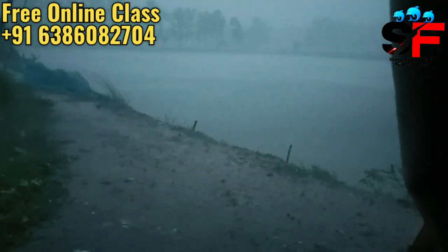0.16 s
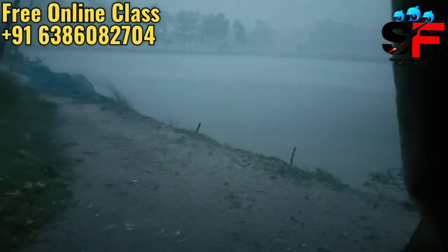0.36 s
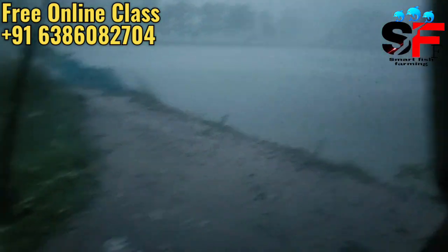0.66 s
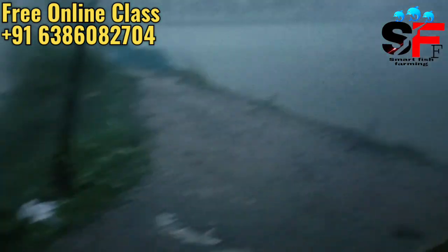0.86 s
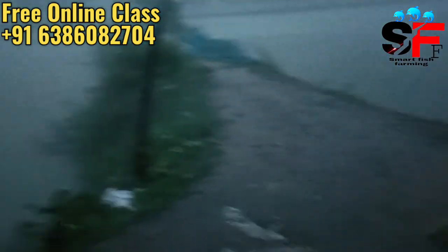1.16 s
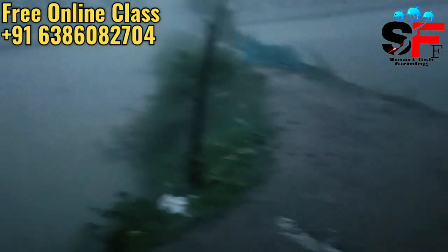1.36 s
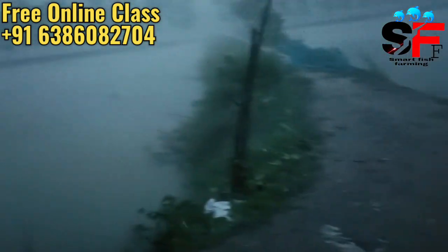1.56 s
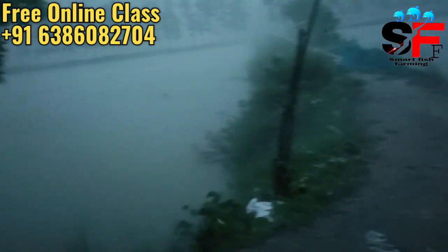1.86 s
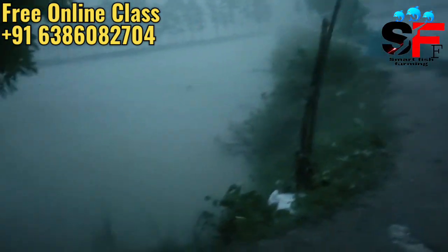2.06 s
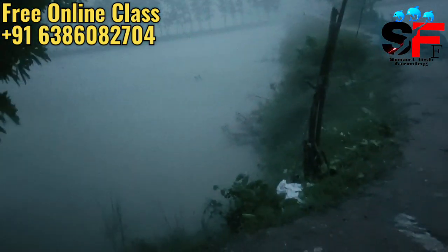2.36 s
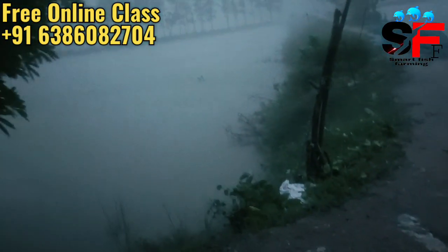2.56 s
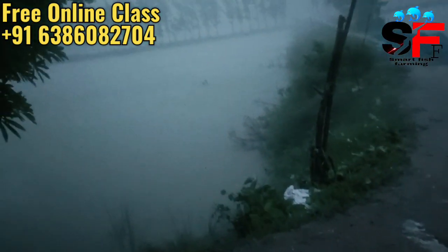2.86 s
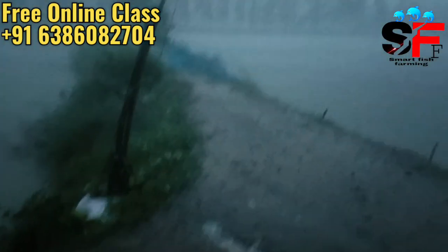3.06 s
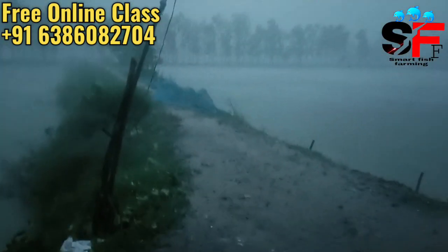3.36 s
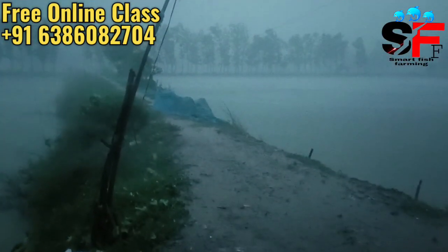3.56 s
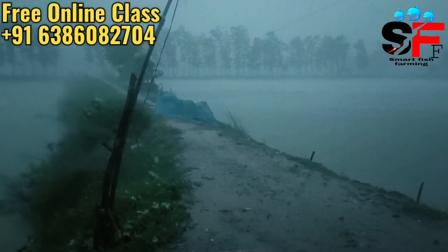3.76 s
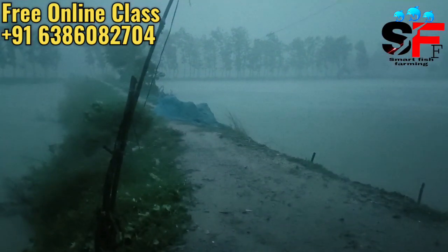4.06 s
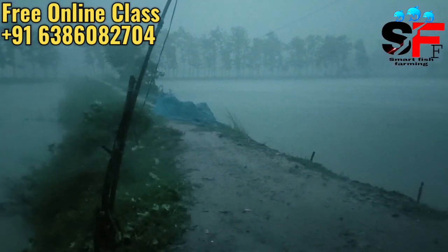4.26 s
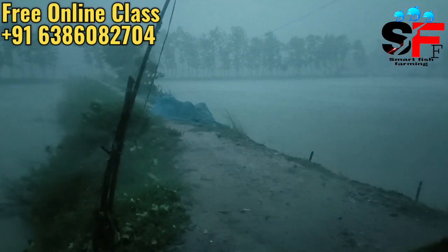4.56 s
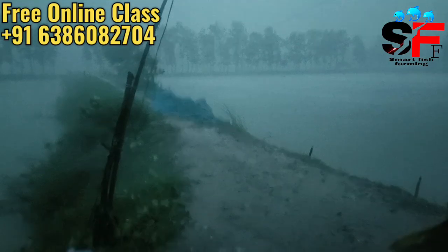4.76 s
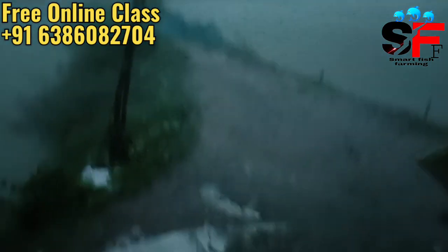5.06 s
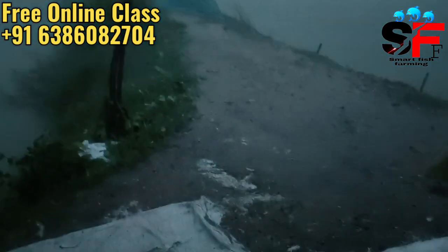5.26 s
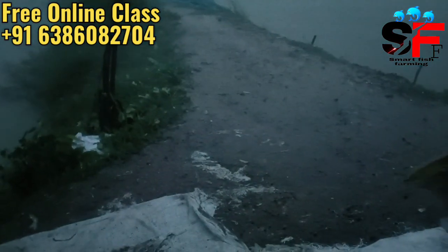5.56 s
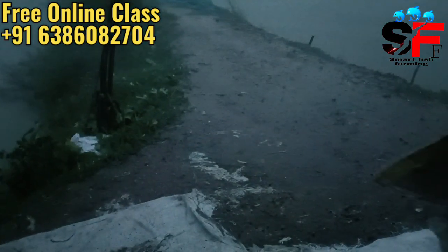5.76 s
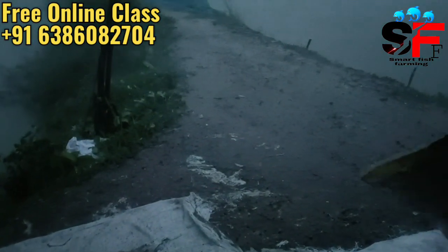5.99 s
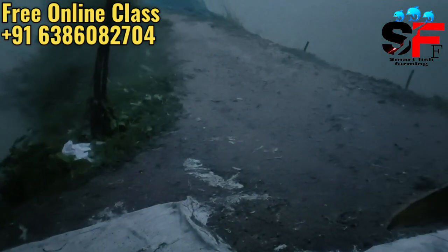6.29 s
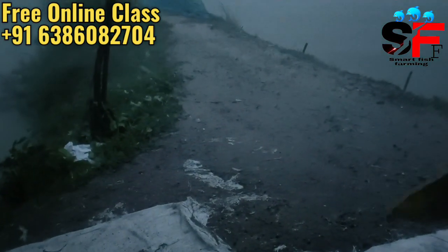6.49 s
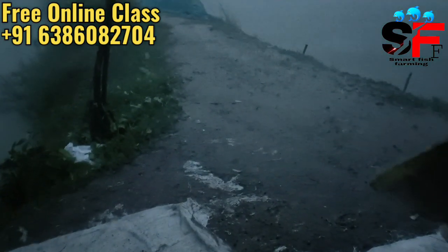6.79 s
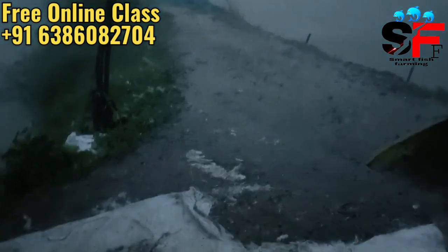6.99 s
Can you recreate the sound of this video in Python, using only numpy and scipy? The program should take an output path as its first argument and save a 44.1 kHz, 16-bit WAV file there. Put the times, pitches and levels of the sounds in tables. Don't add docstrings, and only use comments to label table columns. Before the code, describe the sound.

A torrential downpour is already roaring at full strength, a dense wide wash of countless drops striking a pond and muddy bank, with slight hollow colour from a shelter overhead. The hand-held phone gives it a rough, slightly grainy texture, different on each side. Around 0.15 to 0.25 seconds a few tiny, very high drop ticks touch the phone; at about 0.8 a dull, low bump of the hand. Near 1 second the rain surges and the right side opens brighter; small ticks follow at 1.2 and 1.8. Around 1.9 the tone shifts again as the grip changes. From 2.6 the roar fades rapidly, reaching total silence by 2.7. At about 3.3 it cuts back in abruptly, slightly lower at first, then continues as a steady, even rush with gentle swells until the end at about 7 seconds.

```python
import sys
import numpy as np
from scipy import signal
from scipy.io import wavfile
from scipy.ndimage import uniform_filter1d, minimum_filter1d

SR = 44100
rng = np.random.default_rng(int(sys.argv[2]) if len(sys.argv) > 2 else 0)


def undo_db(level):
    steps = np.asarray(level, float) / 20
    return 10 ** steps


def dump(signal):
    limited = np.clip(np.atleast_2d(signal).T, -1, 1)
    pcm = np.round(limited * 32767).astype(np.int16)
    wavfile.write(sys.argv[1], SR, pcm)


N = 314433
FRAME = 1024


def along(points, hz):
    point_hz, value = np.transpose(points)
    return np.interp(np.log(hz + 1), np.log(point_hz + 1), value)


def curves(rows, t):
    s, *columns = np.transpose(rows)
    return [np.interp(t, s, column) for column in columns]


def unit(x):
    return x / np.sqrt(np.mean(np.abs(x) ** 2) + 1e-20)


def patches(shape, tall, wide):
    field = rng.standard_normal(shape)
    field = uniform_filter1d(field, tall, axis=-2)
    return unit(uniform_filter1d(field, wide, axis=-1))


def rain():
    streams = impacts(spread_db=3.5, far_db=1.5)
    hz, t, (a, b) = signal.stft(streams, SR, nperseg=FRAME, noverlap=FRAME * 3 // 4)
    shared_swells = 0.45 * patches(a.shape, tall=90, wide=12)
    sheets = shared_swells + 0.94 * patches((2,) + a.shape, tall=9, wide=8)
    rings = 1.5 * patches(a.shape, tall=2, wide=5) / (1 + (700 / (hz[:, None] + 1)) ** 2)
    colour = undo_db(port_colour(hz, t) + gusts(hz, t) + sheets + rings + shelter(hz))
    spectra = arrival(hz, t, a, b) * colour
    heard = signal.istft(spectra, SR, nperseg=FRAME, noverlap=FRAME * 3 // 4)[1]
    return undo_db(-7) * heard[:, :N]


def impacts(spread_db, far_db):
    chance, blur = rng.random((2, N)), rng.standard_normal((2, N))
    sign, size = rng.standard_normal((2, 2, N))
    near = (chance < 6000 / SR) * np.sign(sign) * undo_db(spread_db * size)
    return unit(unit(near) + undo_db(far_db) * blur)


# time in seconds, strength in dB, swing towards the left port in dB.
DOWNPOUR = [(0, 2.5, 4.8), (.2, 3.6, 4), (.5, 1.8, 3), (.7, 2.3, -.3), (.98, 4.5, 4.2), (1.25, 1.4, 2.2),
            (1.68, -1.5, 7), (1.84, .2, 6.5), (1.96, -2, .7), (2.2, .2, 1.2), (2.6, 1.7, 1.8),
            (3.34, -1.9, 1.6), (4.1, -1.3, 2), (4.4, -2.2, 1.8), (5.72, -2.2, 2), (5.92, -.4, 1.8),
            (6.62, -2.2, 2), (6.9, -2.9, 2)]


def gusts(hz, t):
    strength, swing = curves(DOWNPOUR, t)
    drift = unit(uniform_filter1d(patches((4, 1, len(t)), tall=1, wide=16)[:, 0], size=12))
    rumble = -1.5 + 0.26 * strength + 0.77 * drift[0]
    fizz = 0.18 * strength + 0.27 * drift[1]
    flurries = 0.51 * drift[2:]
    roars = strength + np.array([swing, -swing]) / 2 + flurries
    low = 1 / (1 + (hz / 480) ** 4)
    high = 1 / (1 + (3700 / (hz + 1)) ** 4)
    outer_bands = np.outer(low, rumble) + np.outer(high, fizz)
    return np.array([outer_bands + np.outer(1 - low - high, roar) for roar in roars])


# frequency in Hz, correlation from -1 to 1.
LIKENESS = [(25, .3), (45, 0.78), (90, .89), (200, 1), (520, 0.81), (860, .47), (1300, 0.11), (1750, -0.42),
            (2500, 0), (10500, 0.17), (12500, 0.1), (14000, .45), (15600, .45)]
# time in seconds, lag of the left port in ms.
HEADING = [(0, 0.019), (1.0, .105), (1.9, -0.013), (2.8, -.074), (3.2, 0.15)]


def arrival(hz, t, a, b):
    turn = np.arccos(np.clip(along(LIKENESS, hz), -1, 1))[:, None] / 2
    (lag_ms,) = curves(HEADING, t)
    phase = np.outer(2 * np.pi * hz / (1 + (hz / 1600) ** 4), lag_ms / 1000)
    common, differing = np.cos(turn) * a, np.sin(turn) * b
    left = (common + differing) * np.exp(-.5j * phase)
    right = (common - differing) * np.exp(.5j * phase)
    return np.array([left, right])


# frequency in Hz, response in dB per Hz.
LEFT_PORT = [(25, -38.5), (90, -10.5), (200, -0.5), (600, -1.5), (1500, -4.5), (2700, -12.5), (4000, -16),
             (5000, -25.5), (6300, -27.5), (7900, -18), (8500, -25), (11600, -27), (13000, -29),
             (15700, -31.5)]
RIGHT_PORT = [(25, -38), (90, -10.5), (200, 1.85), (600, -1.45), (1700, -1.42), (2700, -3.5), (5600, -5),
              (6200, -10), (6500, -22), (7300, -31), (9000, -35.5), (12000, -27.5), (14000, -25),
              (15700, -22)]
# frequency in Hz, change in dB.
LEFT_PALM = [(600, -1), (2000, -6), (4000, -7), (5200, 6.5), (6400, 9.5), (7100, -6), (8000, -7.5),
             (8800, -8.5), (12000, -1), (15700, -4)]
LEFT_CUPPED = [(600, -1.6), (2200, 0), (4500, -3), (6000, 6.5), (7000, 11.5), (8000, 4.5), (10000, 2),
               (11000, 1), (15700, -0.5)]
RIGHT_COVERED = [(300, -1.5), (800, 2.5), (1500, 4.5), (2450, 4.5), (3250, -4), (4200, -2.5), (5000, -6),
                 (5900, -11.5), (7000, -9), (9000, -8.5), (12000, -9), (15700, -7)]
RIGHT_OPEN = [(300, -0.7), (900, 5), (2000, 4.5), (3500, 2.1), (5000, 0.2), (7000, 3.5), (8000, -1),
              (12000, 1), (14500, 3.5), (15700, 3.5)]
GRIP = [
    (0, 0.96, 0, 1, 0.27),
    (.84, 0.7, 0.05, 1, 0.06),
    (1.0, 0.7, 0, 0.22, 1),
    (1.88, 0.77, 0, 0.01, 1),
    (1.94, 0, 0.6, 0.43, 0.7),
    (2.0, 0.02, 0.8, 0.2, 0.4),
    (2.8, 0.3, 0.93, 0.43, 0),
    (3.2, 0, 0.01, 0.38, 0.7),
]


def port_colour(hz, t):
    palm, cupped, covered, opened = curves(GRIP, t)
    left_db = along(LEFT_PORT, hz)[:, None] + np.outer(along(LEFT_PALM, hz), palm)
    left_db = left_db + np.outer(along(LEFT_CUPPED, hz), cupped)
    right_db = along(RIGHT_PORT, hz)[:, None] + np.outer(along(RIGHT_COVERED, hz), covered)
    right_db = right_db + np.outer(along(RIGHT_OPEN, hz), opened)
    return np.array([left_db, right_db])


# frequency in Hz, width in Hz, boost in dB.
SHELTER = [
    (250, 74, 1.5),
    (571, 52, 3),
    (780, 20, 1),
]


def shelter(hz):
    return sum(db / (1 + ((hz - centre) / width) ** 2) for centre, width, db in SHELTER)[:, None]


# start in seconds, level in dB before a lift of 9 left and 12 right, ring in Hz,
# left-right difference in dB before that lift.
TICKS = [
    (.151, -36.5, 15000, -2),
    (.179, -24, 13980, -3.5),
    (.246, -31, 14100, -2),
    (1.210, -34.5, 14000, -13),
    (1.802, -25.5, 14540, -10),
]


def ticks():
    out, t = np.zeros((2, N + SR)), np.arange(SR // 50) / SR
    for s, db, hz, pan_db in TICKS:
        envelope = undo_db(db - 60 * t / .002) * (1 - np.exp(-t / .0002))
        ring = envelope * np.sin(2 * np.pi * hz * t)
        out[:, round(s * SR):][:, :len(t)] += ring * undo_db([[pan_db / 2 + 9], [12 - pan_db / 2]])
    return out[:, :N]


# start in seconds, peak in dB, frequency in Hz, 60 dB decay time in seconds.
KNOCKS = [
    (0.782, -15, 158, 0.073),
]


def knocks():
    out, t = np.zeros(N + SR), np.arange(SR // 5) / SR
    for s, db, hz, t60 in KNOCKS:
        envelope = undo_db(db - 60 * t / t60) * (1 - np.exp(-t / 0.0029))
        out[round(s * SR):][:len(t)] += envelope * np.sin(2 * np.pi * hz * t)
    return out[:N]


def scene():
    return rain() + ticks() + knocks()


def limiter(x):
    needed = np.minimum(1, .93 / (np.abs(x).max(axis=0) + 1e-9))
    return x * uniform_filter1d(minimum_filter1d(needed, size=257), size=257)


# frequency in Hz, step in dB.
ROUNDING = [(100, -22), (700, -15), (1400, -6), (3000, -1), (5500, -.5), (7300, -.5), (9000, -3),
            (12000, -2.5), (15500, -2)]


def phone_rounding(x, thrift, fickle_db, even_db, lose_side, lose_mid):
    n, k = np.arange(2 * FRAME)[:, None] + .5, np.arange(FRAME) + .5
    window = np.sin(np.pi * n / (2 * FRAME))
    basis = window * np.cos(np.pi / FRAME * (n + FRAME / 2) * k) * np.sqrt(2 / FRAME)
    lead, count = 2 * FRAME - 544, N // FRAME + 4
    padded = np.pad(x, ((0, 0), (lead, count * FRAME - lead - N)), "reflect")
    halves = padded.reshape(2, count, FRAME)
    lines = np.concatenate([halves[:, :-1], halves[:, 1:]], axis=2) @ basis
    lines = lines.reshape(2, count - 1, 64, 16)
    hz = (np.arange(64) + .5) * SR / 128
    level_db = 10 * np.log10(np.mean(lines ** 2, axis=3) + 1e-12)
    fickle = rng.standard_normal((2, count - 1, 32)).repeat(2, axis=2)
    dice = rng.random((count - 1, 32)).repeat(2, axis=1)

    gap_db = uniform_filter1d(level_db[0] - level_db[1], size=3, axis=0)
    gap_db = uniform_filter1d(gap_db, size=2, axis=1)
    joined = (np.abs(gap_db) < even_db) & (hz > 5000)

    def swap(pair):
        rotated = np.array([pair[0] + pair[1], pair[0] - pair[1]]) / np.sqrt(2)
        return np.where(joined[..., None], rotated, pair)

    lost = joined & np.array([dice < lose_mid, dice > 1 - lose_side])
    keep = ~lost[..., None]
    step_db = level_db + along(ROUNDING, hz) - thrift * np.maximum(level_db + 17, -26)
    step = undo_db(step_db + fickle_db * fickle)[..., None]
    step = step * np.where(joined, undo_db(3.5 * dice), 1)[..., None]
    pair = swap(lines) * keep * np.where(keep[0] & keep[1], 1, undo_db(3.5))
    rounded = swap(np.sign(pair) * np.floor(np.abs(pair) / step + .4054) * step)
    band = np.arange(FRAME) * SR / (2 * FRAME) < 15830
    blocks = (rounded.reshape(2, count - 1, FRAME) * band) @ basis.T
    out = blocks[:, 1:, :FRAME] + blocks[:, :-1, FRAME:]
    return out.reshape(2, -1)[:, lead - FRAME:][:, :N]


# time in seconds, level in dB.
FADE = [(2.63, -1), (2.655, -7), (2.68, -11), (2.693, -17), (2.703, -32), (2.712, -42), (2.718, -70)]


def fade_and_return():
    t, return_s = np.arange(N) / SR, 3.3362
    recover = undo_db(-1.3 * np.exp(-np.abs(t - return_s) / 0.42))
    fade = np.where(t < 3, undo_db(curves(FADE, t)[0]), recover)
    sounding = (t < FADE[-1][0]) + np.clip((t - return_s) / .0001, 0, 1)
    return fade * sounding


def top_cut(x):
    return signal.sosfilt(signal.butter(12, 16050, fs=SR, output="sos"), x)


def record(dry):
    rounded = phone_rounding(limiter(dry), thrift=.35, fickle_db=2, even_db=4.5, lose_side=.45, lose_mid=.17)
    return top_cut(rounded * fade_and_return())


dry = scene()
out = record(dry)
dump(out)
```